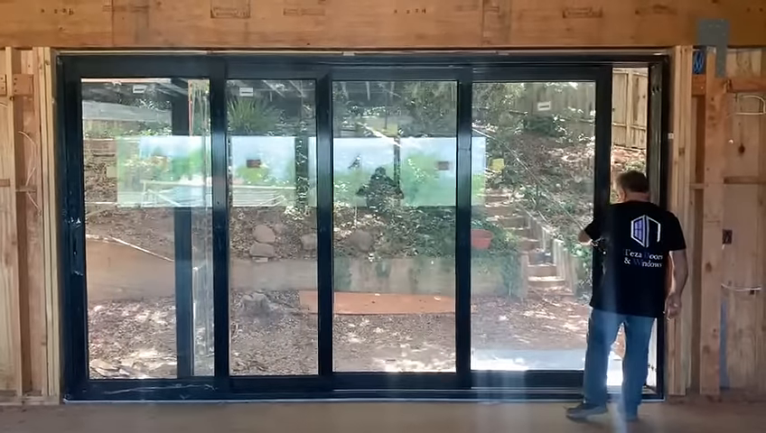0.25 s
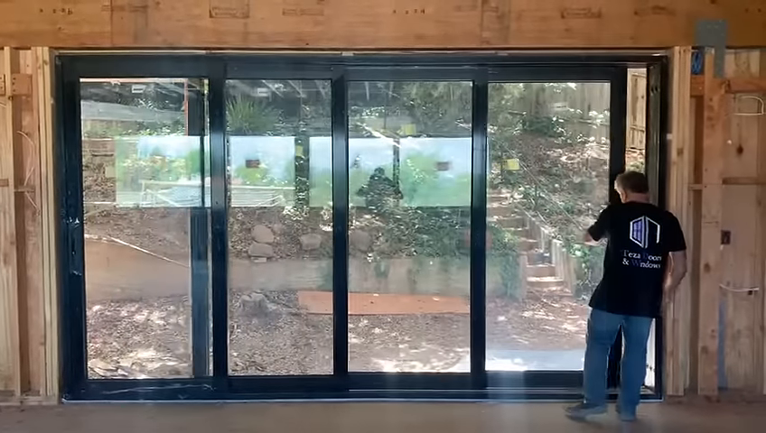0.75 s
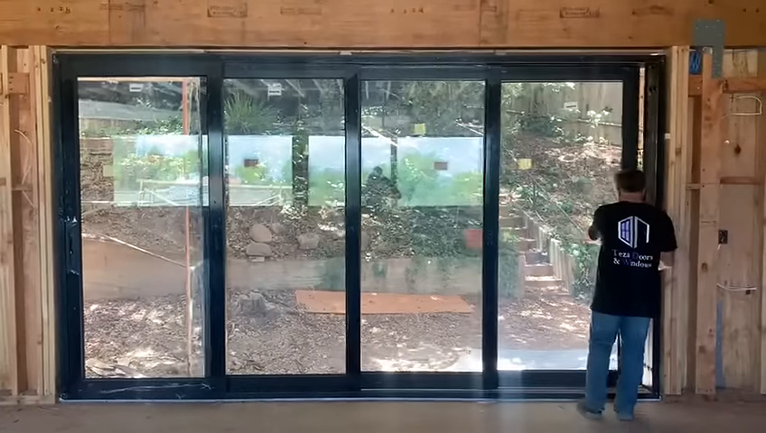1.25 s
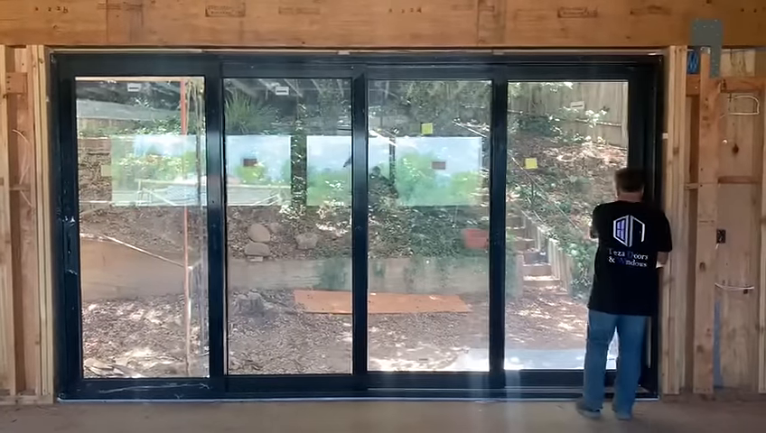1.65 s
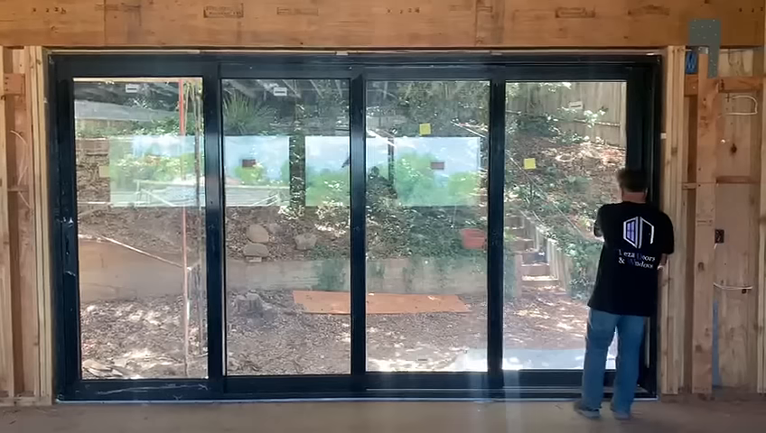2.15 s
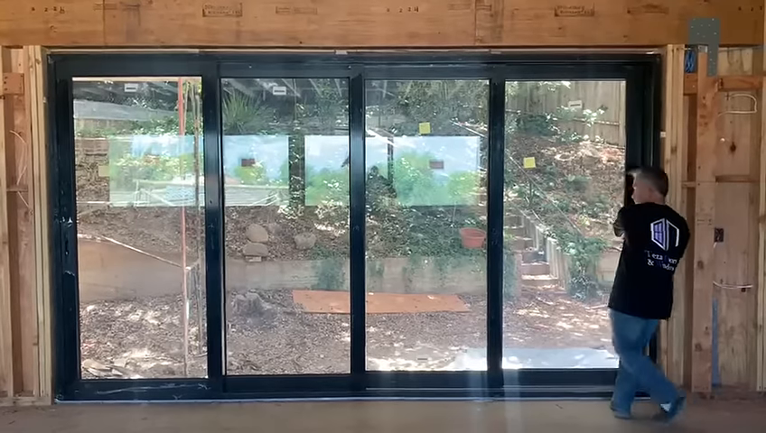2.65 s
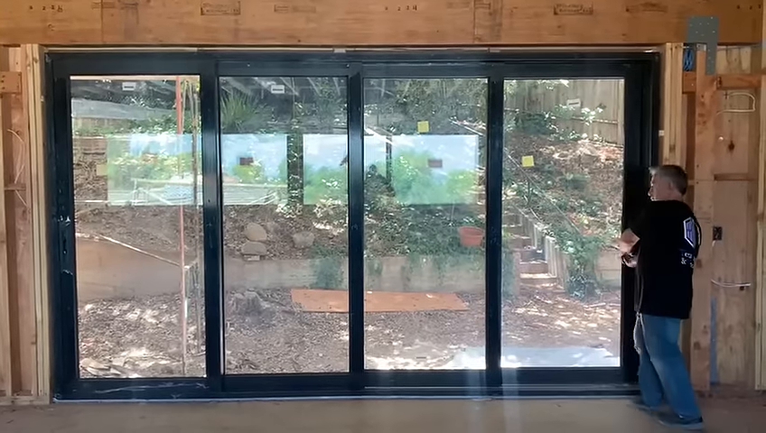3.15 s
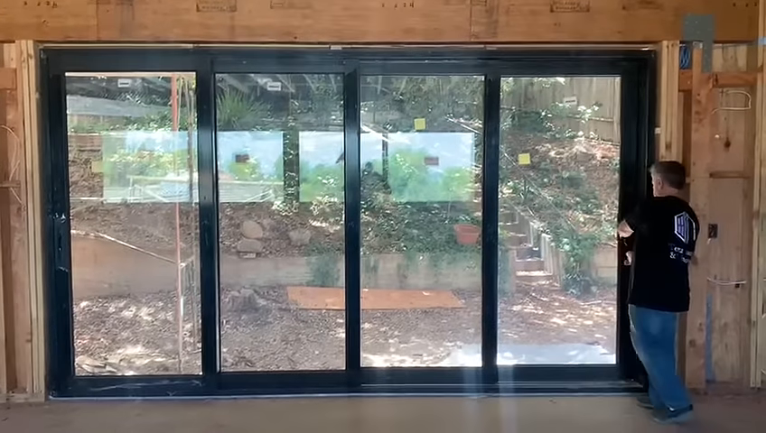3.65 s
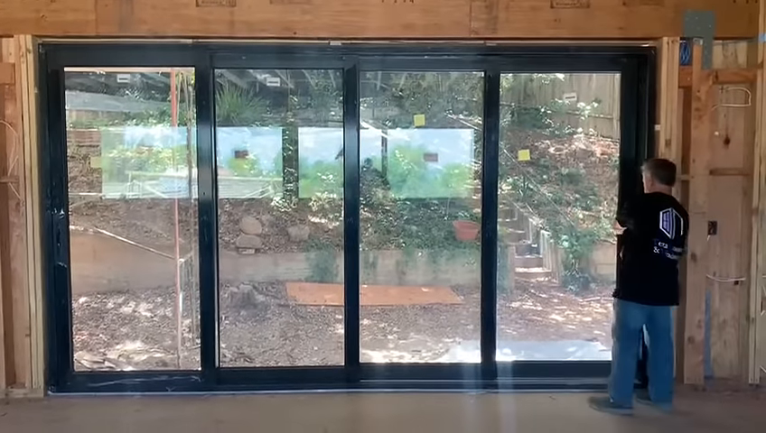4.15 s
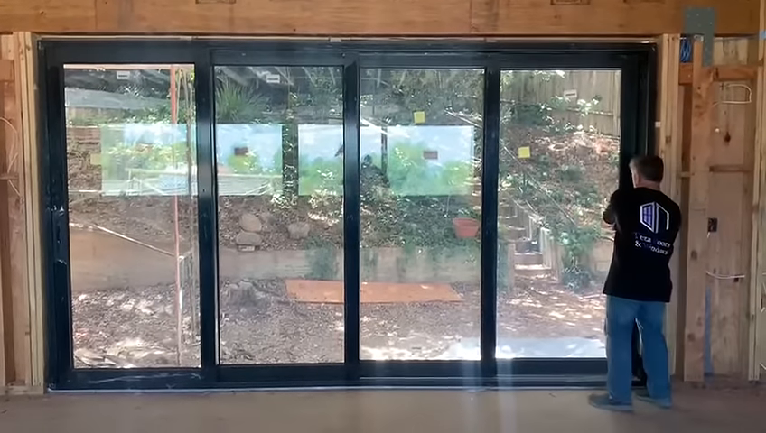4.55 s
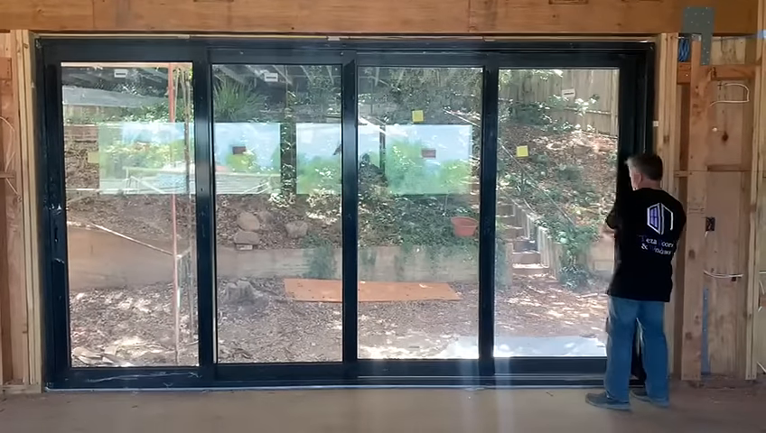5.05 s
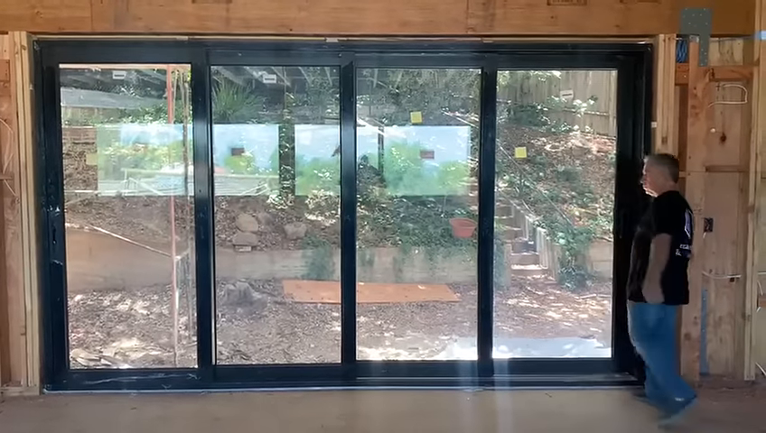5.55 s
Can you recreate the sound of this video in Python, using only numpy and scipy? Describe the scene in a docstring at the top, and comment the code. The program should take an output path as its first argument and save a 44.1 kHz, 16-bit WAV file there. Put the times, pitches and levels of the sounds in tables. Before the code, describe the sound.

A low rolling rumble ends in a cluster of thuds, followed by small clicks, scuffs and one loud metallic latch slam with roomy reverberation.

```python
"""Heavy glass panels rumble along their track, fade, then swell briefly and bump to a stop in a bare room
of timber and concrete. Shoes scuff the slab, the handle knocks, the lock clicks and the latch slams home.
Rollers are grit thumps and seal hiss; blows and friction are shaped pushes and noise; metal and glass are
decaying sines. All of it stirs a diffuse room, heard some metres away by a close pair of microphone ports."""
import sys
import numpy as np
from scipy import signal
from scipy.fft import rfft, irfft, next_fast_len
from scipy.io import wavfile
from scipy.ndimage import uniform_filter1d

SR = 44100
rng = np.random.default_rng(int(sys.argv[2]) if len(sys.argv) > 2 else 0)


def master_out(mix):
    """Clip the mix to full scale and print it as 16-bit PCM to the path in sys.argv[1]."""
    frames = np.transpose(np.atleast_2d(mix))
    ceiling = np.clip(frames, -1, 1)
    pcm = np.round(ceiling * 32767).astype(np.int16)
    wavfile.write(sys.argv[1], SR, pcm)


N = 256216

# Source levels in the tables stand ahead of the mixing gains in scene().
# edges of the bands that carry blows and friction: edge_hz
BAND_EDGES_HZ = [30, 100, 200, 400, 1000, 2500, 5000, 8500, 12500]


def amp(db):
    """Turns decibels into gain."""
    return 10 ** (np.asarray(db) / 20)


def evened(x):
    """Scales to an rms of one."""
    return x / np.sqrt(np.mean(x ** 2) + 1e-20)


def read(points, hz):
    """Reads a table over log frequency."""
    f, value = np.transpose(points)
    return np.interp(np.log(hz + 1), np.log(f + 1), value)


def coloured(x, points):
    """Shapes a signal by a spectrum in dB."""
    size = next_fast_len(N)
    gain = amp(read(points, np.fft.rfftfreq(size, 1 / SR)))
    return irfft(rfft(x, size) * gain, size)[:N]


def band(x, lo, hi):
    """Passes the band between two pitches in Hz."""
    return signal.sosfilt(signal.butter(2, [lo, hi], "bandpass", fs=SR, output="sos"), x)


def centres(count):
    """Gives the middle pitch of the top bands, as a column."""
    edges = np.array(BAND_EDGES_HZ[-count - 1:])
    return np.sqrt(edges[1:] * edges[:-1])[:, None]


def add(mix, s, sound):
    """Mixes one sound into every row from s seconds on."""
    part = mix[:, round(s * SR):][:, :sound.shape[1]]
    part += sound[:, :part.shape[1]]


def through_bands(envelopes, push_hz=400):
    """Each envelope drives its band's filter: as one push in the bass, as noise above."""
    edges = BAND_EDGES_HZ[-len(envelopes) - 1:]
    out = np.zeros(N)
    for envelope, lo, hi in zip(envelopes, edges, edges[1:]):
        noise = rng.standard_normal(N) * np.sqrt(SR / 2 / (hi - lo))  # even power for any bandwidth
        drive = 3 if hi < 1.1 * push_hz else noise
        out += band(envelope * drive, lo, hi)
    return out


def struck(hits, modes, rise_s, detune=0.0065):
    """Each hit rings the object's modes as decaying sines, with its own tilt and small random changes."""
    out, t = np.zeros((1, N)), np.arange(SR // 5) / SR
    chance = rng.standard_normal((len(hits), len(modes), 2))
    for (s, level_db, tilt_db), spread in zip(hits, chance):
        ring = np.zeros(len(t))
        for (hz, db, t60), (level_chance, pitch_chance) in zip(modes, spread):
            mode_db = db + tilt_db * np.log2(hz / 1000) + 1.5 * level_chance
            pitch = hz * (1 + detune * pitch_chance)
            ring += amp(mode_db - 60 * t / t60) * np.sin(2 * np.pi * pitch * t)
        onset = np.minimum(t / max(rise_s, 1 / SR), 1)
        add(out, s, amp(level_db) * onset * ring[None])
    return out[0]


def still_air():
    """The idle room is two unrelated beds of coloured noise that rise, then fall away."""
    # colour of the still room: pitch_hz, relative level_db
    colour = [(15, -57.5), (25, -36.5), (60, 1.5), (183, -7.5), (367, -14), (500, -26), (1500, -32.5),
              (4730, -26.5), (5120, -32.5), (7350, -32), (8360, -34.5), (12000, -27), (15600, -65.5),
              (22000, -120)]
    # its loudness: time_s, level_db
    loudness = [(0, -77), (3.5, -68), (5, -70.5), (5.249, -74), (5.81, -77)]
    air = np.array([evened(coloured(rng.standard_normal(N), colour)) for _ in range(2)])
    return amp(np.interp(np.arange(N) / SR, *np.transpose(loudness))) * air


def diffuse(x, size, weight, patchy_db, blur=0):
    """Every pitch stores energy that dies at its own speed and returns as two unrelated, patchy fields."""
    # how long the room holds each pitch: pitch_hz, t60_s
    decay = [(40, 1), (150, 0.8), (500, 1), (1400, 0.74), (3100, 0.67), (6500, 0.42), (11500, 0.17)]
    hz, t, z = signal.stft(x, SR, nperseg=size, noverlap=size * 3 // 4)
    keep = amp(-2 * 60 * t[1] / read(decay, hz))  # doubled, as this is energy
    stored = uniform_filter1d(abs(z) ** 2, size=2, axis=0) * weight(hz)[:, None]
    for k in range(1, len(t)):
        older = stored[:, k - 1]
        # this share of the energy passes to each neighbouring pitch per frame
        older = older + blur * (np.roll(older, 1) + np.roll(older, -1) - 2 * older)
        stored[:, k] = keep * older + (1 - keep) * stored[:, k]
    re, im, patches = rng.standard_normal((3, 2, *z.shape))
    patches = evened(uniform_filter1d(patches, size=6000 // size, axis=2))  # standing waves linger
    field = np.sqrt(abs(stored)) * (re + 1j * im) * amp(patchy_db * patches)
    tail = signal.istft(field, SR, nperseg=size, noverlap=size * 3 // 4)[1]
    return np.pad(tail, [(0, 0), (size // 2, 0)])[:, :N]  # reflections come after the direct sound


def room(x, split_hz=250):
    """The treble fills the room quickly, the bass slowly, through short and long frames."""
    def above(hz):
        return 1 / (1 + (split_hz / (hz + 1)) ** 6)

    def below(hz):
        return 1 / (1 + (hz / split_hz) ** 6)

    treble = diffuse(x, size=512, weight=above, patchy_db=3.0, blur=0.04)
    bass = diffuse(x, size=2048, weight=below, patchy_db=3.0)
    return treble + amp(0.5) * bass


def scuffs(grain_db=1.5, catch_db=4.5):
    """Soles and hands drag as gritty noise that swells and lets go; catching grit rings the rubbed part."""
    # drags: start_s, strength_db, tilt_db_per_octave, swell_s, length_s, rubbed_part_hz, rubbed_part_db
    drags = [(1.1, -42, 3, 0.0034, 0.068, 2850, -49.5), (1.167, -57.5, 0.3, 0.019, 0.21, 2800, -70),
             (2.261, -45, 0, 0.031, 0.079, 4200, -52), (2.721, -59, 1.8, 0.018, 0.15, 1720, -61),
             (2.821, -48.5, -0.5, 0.02, 0.14, 1390, -52), (2.901, -51.5, 0.5, 0.04, 0.14, 1600, -67),
             (2.953, -47.5, -4.5, 0.052, .13, 2230, -48), (3.284, -56, 0, 0.017, 0.12, 2500, -83),
             (3.761, -44, -2.5, 0.01, 0.07, 4000, -51), (3.9, -40, -3, 0.054, 0.11, 1120, -48.5),
             (4.495, -52.5, -7, 0.034, 0.09, 1830, -47.5), (4.624, -47, -8, 0.029, 0.064, 3800, -69),
             (4.895, -60, -5.5, 0.013, 0.078, 2100, -58), (5.267, -48.5, 1.1, 0.029, 0.068, 2820, -64),
             (5.643, -63, 2.5, 0.033, 0.15, 3510, -71)]
    # colour of the friction: pitch_hz, level_db
    friction = [(280, -25), (630, -8), (1580, -3.5), (3500, 0.5), (6500, -6), (10300, -8)]
    rub_width, catches_per_s = 0.14, 370  # resonance reaches this share to either side of its pitch
    let_go_s = 0.15  # shorter drags never reach full strength
    hz = centres(count=6)
    envelopes, rubbed = np.zeros((len(hz), N)), np.zeros((1, N))
    catches = amp(catch_db * np.minimum(rng.exponential(1, N), 4))
    catches *= (rng.random(N) < catches_per_s / SR) * rng.choice([-1., 1.], N)
    for s, db, tilt_db, rise, length, part_hz, part_db in drags:
        t = np.arange(0, max(length, .02), 1 / SR)
        stroke = np.clip(t / max(rise, .002), 0, 1) * np.clip((t[-1] - t) / let_go_s, 0, 1)
        add(envelopes, s, amp(db + read(friction, hz) + tilt_db * np.log2(hz / 2500)) * stroke)
        caught = catches[round(s * SR):][:len(t)]
        ring = band(caught, part_hz / (1 + rub_width), part_hz * (1 + rub_width))
        add(rubbed, s, amp(part_db) * evened(ring)[None] * stroke[:len(ring)])
    grain = evened(uniform_filter1d(rng.standard_normal(envelopes.shape), size=300))
    return through_bands(envelopes * amp(grain_db * grain), push_hz=0) + rubbed[0]


def lock_ticks():
    """Small parts of the lock tick, each a short cluster of decaying sines."""
    # ticks: start_s, level_db, tilt_db_per_octave
    ticks = [(3.522, -46, -5), (3.534, -51.5, -3), (3.6415, -48, -3.5), (3.655, -52, -6), (3.673, -55.5, 5),
             (3.69, -58, -0.5), (3.715, -55.5, 1.5), (3.916, -46, -2)]
    # rings of the small parts: pitch_hz, level_db, t60_s
    pins = [(1055, -0.5, 0.036), (1315, -3, 0.043), (1810, -4.5, 0.071), (4000, -11.5, 0.04),
            (4350, -7.5, 0.1), (6570, -11, .025)]
    return struck(ticks, pins, rise_s=0.00068, detune=.02)


def handle_knocks():
    """The handle knocks in its seat, with a softer onset and low, brief rings."""
    # knocks: start_s, level_db, tilt_db_per_octave
    knocks = [(3.199, -53, -1), (3.209, -45, 0.7), (3.219, -41, 1), (3.232, -49.5, -4.5), (4.629, -46, 5),
              (4.647, -43, 3), (4.661, -48, -4.5), (4.683, -59, 7), (4.908, -48.5, -0.5), (4.94, -52.5, -4),
              (5.012, -66, -5)]
    # rings of the handle: pitch_hz, level_db, t60_s
    handle = [(309, -2, 0.058), (506, -1.5, 0.052), (643, 0.5, 0.069), (895, -7, 0.074), (1330, -7, 0.023),
              (1930, -2, 0.021)]
    return struck(knocks, handle, rise_s=0.0035, detune=0.02)


def lock_snaps():
    """The metal of the lock clicks and rings on its own pitches."""
    # clicks: start_s, level_db, tilt_db_per_octave
    snaps = [(2.483, -40, 0.5), (2.4914, -40, -1.5), (2.4964, -43, -9), (2.514, -49, 2.5), (2.528, -45, -3),
             (2.545, -49, -1), (2.565, -59, -5), (2.591, -54, 3), (2.596, -55, 0), (2.61, -59, -2),
             (2.626, -52, -2)]
    # rings of the lock: pitch_hz, level_db, t60_s
    lock = [(885, -11.5, .06), (1203, -4.5, 0.061), (1823, -13, 0.14), (2283, -5.5, 0.12),
            (2650, -7.5, 0.096), (3835, -1.5, 0.06), (4420, -8, 0.064), (5000, -21, .1), (6930, -25, 0.042)]
    return struck(snaps, lock, rise_s=0.00068)


def latch_slams():
    """The latch slams home and chatters, ringing latch and jamb."""
    # slams: start_s, level_db, tilt_db_per_octave
    slams = [(4.0105, -19.5, 5.5), (4.017, -23.5, 3.5), (4.021, -24.5, 0), (4.031, -34, -5),
             (4.045, -36, -1.5), (4.054, -39, -1), (4.074, -34.5, 4), (4.088, -40.5, 1.5),
             (4.123, -34.5, 4), (4.163, -36.5, -1)]
    # rings of latch and jamb: pitch_hz, level_db, t60_s
    jamb = [(315, -12, 0.036), (481, -17, 0.05), (945, -11.5, 0.084), (1107, -4.5, 0.035),
            (1410, -6, 0.047), (1810, -4, 0.028), (1950, -8, 0.019), (2580, -6, 0.014),
            (3326, -11.5, 0.014), (3940, -10.5, 0.021), (6450, -16, 0.017)]
    return struck(slams, jamb, rise_s=0.00096, detune=0.017)


def booms():
    """After a jolt the glass panels swell over a cycle or so and die on one pitch."""
    # jolts: start_s, level_db, pitch_hz, t60_s
    jolts = [(1.655, -37.5, 270, .1), (1.686, -29, 249, .1), (1.7205, -21.5, 166, 0.059),
             (1.7226, -26, 269, 0.039), (1.802, -29.5, 110, 0.062), (2.294, -40.5, 283.5, .14),
             (2.301, -47, 152, .15), (2.338, -46, 289, .12), (2.663, -33.5, 148, 0.094),
             (2.797, -45, 140, .1), (4.012, -25.5, 317, .13), (4.039, -28.5, 491, .13),
             (4.094, -24.5, 172.5, 0.076), (4.118, -30.5, 1405, .06), (4.714, -44, 113, .1),
             (5.313, -59, 128, .12), (5.684, -53, 143, .15), (5.72, -59.5, 131, .15),
             (5.784, -52, 110, .12)]
    rise_cycles = 1.5
    out, t = np.zeros((1, N)), np.arange(SR // 4) / SR
    for s, db, hz, t60 in jolts:
        swell = np.minimum(t * hz / rise_cycles, 1)
        boom = swell * amp(db - 60 * t / t60) * np.sin(2 * np.pi * hz * t)
        add(out, s, boom[None])
    return out[0]


def blows(crack=0.13):
    """Each blow is a thud and a crack, shorter in the treble, that set the door ringing."""
    # blows on door, handle and floor: start_s, thud_db, thud_hz, crack_db, treble_tilt_db_per_octave
    impacts = [(0.669, -39.5, 142, -49, -6.5), (1.047, -36, 180, -76, 2.5),
               (1.656, -43.5, 266, -35.5, -7.5), (1.674, -32, 242, -30, -0.5), (1.685, -31, 236, -37, -10),
               (1.693, -39, 273, -42, -16), (1.7, -24, 163.5, -32, -50), (1.726, -34.5, 201.5, -40, -8),
               (1.736, -45, 70, -50, -2), (1.762, -31.5, 70.4, -38.5, -5), (1.776, -36, 200, -41, -6.5),
               (1.79, -41.5, 200.6, -43.5, -10), (1.81, -40, 109, -43, -15), (1.837, -41, 150, -46, -8),
               (1.869, -36.5, 111, -54.5, -4), (1.915, -36, 70, -69, -5), (2.155, -47, 198, -43.5, -32),
               (2.293, -52, 310, -49.5, -1), (2.48, -53, 900, -47, 5), (2.588, -44.5, 905, -44, 0.5),
               (2.66, -39.5, 300, -56, -15), (2.715, -42.5, 160, -58, -7), (2.761, -40, 166, -62, -7),
               (2.795, -46, 141.7, -51, -1), (3.195, -48.5, 437, -42, -11.5),
               (3.519, -57, 1200, -48.5, -20.5), (3.638, -49, 1220, -42.5, -9.5),
               (4.008, -45, 250, -22.5, -1), (4.013, -34.5, 222, -39, -2), (4.032, -33, 250, -44, -4.5),
               (4.096, -35.5, 133.7, -33, -0.5), (4.085, -46.5, 199.3, -34.5, 0.5),
               (4.575, -54, 278, -66, -13), (4.627, -54, 590, -48, 0), (4.768, -41, 118.7, -42, -38),
               (4.905, -49, 330, -51, -14), (5.657, -44.5, 202, -64.5, 4.5), (5.753, -49, 101, -65.5, 0)]
    # rings of frame and glass: pitch_hz, level_db, t60_s
    door = [(150, -1, 0.052), (196, 1, 0.055), (269, 7.5, 0.056), (400, -3, 0.08), (690, -4, 0.065),
            (1194, 3, 0.055), (1300, -3.5, 0.062), (1740, -8, 0.057), (1940, -6.5, 0.041),
            (2620, -4.5, 0.09)]
    thud_below_db, thud_above_db = 13, 19.5  # fall per octave on either side of the thud's pitch
    thud_lag_s = 0.0029  # the mass arrives just after the crack
    thud_rise, thud_contact = 0.54, 2  # time constants in cycles of the thud's pitch
    knee_hz, crack_below_db = 1210, 6  # knee of the crack; fall per octave under it
    rise_s, contact_s = 0.0039, 0.0087  # time constants of a hard crack in a band that ends at 1 kHz
    hard_db, softer_per_db = -20, 0.0032  # each dB under hard spreads the crack by this share
    ring_db = 5
    envelopes = np.zeros((len(BAND_EDGES_HZ) - 1, N))
    t, hz = np.arange(SR // 4) / SR, centres(count=8)
    quicker = (np.array(BAND_EDGES_HZ[1:])[:, None] / 1000) ** crack
    over_knee = np.log2(hz / knee_hz)
    for s, thud_db, thud_hz, crack_db, tilt_db in impacts:
        over_thud = np.log2(hz / thud_hz)
        thud = amp(thud_db + np.minimum(thud_below_db * over_thud, -thud_above_db * over_thud))
        slope_db = np.where(over_knee > 0, tilt_db, crack_below_db)
        snap = (hz > 400) * amp(crack_db + slope_db * over_knee)
        u = t * quicker / (1 + softer_per_db * max(hard_db - crack_db, 0))
        add(envelopes, s, snap * (1 - np.exp(-u / rise_s)) * np.exp(-u / contact_s))
        cycles = t * thud_hz
        push = (1 - np.exp(-cycles / thud_rise)) * np.exp(-cycles / thud_contact)
        add(envelopes, s + thud_lag_s, thud * push)
    burst = through_bands(envelopes)
    rings = np.zeros(len(t))
    for pitch, db, t60 in door:
        at_resonance = 2 * np.log(1000) / t60 / SR  # makes the mode's level its gain at resonance
        rings += amp(db - 60 * t / t60) * np.cos(2 * np.pi * pitch * t) * at_resonance
    return burst + amp(ring_db) * signal.oaconvolve(burst, rings)[:N]


def rolling():
    """Grit under the rollers thumps the panel body; the brush seals hiss along the frame."""
    # rumble of the rollers up to the stop: time_s, level_db
    roll = [(0, -49.5), (.5, -51), (1, -51), (1.2, -51.5), (1.35, -54), (1.5, -58), (1.619, -62),
            (1.68, -37.5)]
    # colour of the panel body under the rollers: pitch_hz, relative level_db
    body = [(15, -45.5), (25, -35), (38, -14.5), (91, 2), (155, -1), (193, 3.5), (231, 3.5), (371, -20),
            (450, -86), (580, -46), (990, -120)]
    # colour of the brush seals: pitch_hz, relative level_db
    seals = [(240, -27), (400, -8.5), (953, -1), (2270, -9), (3060, -3.5), (5490, -12), (7290, -20.5),
             (9160, -35), (10700, -18.5), (12000, -26.5), (15600, -82.5), (22000, -120)]
    bumps_per_s = 170
    seals_db, seals_follow = -53, 0.38  # hiss at the start; share of the rumble's change it follows
    s, db = np.transpose(roll)
    t = np.arange(N) / SR
    rumble_db = np.interp(t, s, db)
    moving = np.clip((s[-1] - t) / 0.013, 0, 1)  # comes to rest over the last 13 ms
    grit = amp(1.8 * np.minimum(rng.exponential(1, N), 5)) * (rng.random(N) < bumps_per_s / SR)
    rumble = evened(coloured(grit * rng.choice([-1., 1.], N), body))
    hiss = evened(coloured(rng.standard_normal(N), seals))
    hiss_db = seals_db + seals_follow * (rumble_db - db[0])
    return moving * (amp(rumble_db) * rumble + amp(hiss_db) * hiss)


def scene():
    """Mixes two rows: the centre sound and the side sound, which is opposed in left and right."""
    roll, near = rolling(), blows() + scuffs()
    brief = booms() + lock_ticks()  # these stir the room less
    latch = lock_snaps() + latch_slams() + handle_knocks()
    direct = amp(-4.5) * roll + amp(-3.0) * near + latch + amp(-1.5) * brief
    # a small difference in arrival time puts the side part a quarter turn behind
    sideways = amp(-2.5) * signal.hilbert(direct, next_fast_len(N)).imag[:N]
    into_room = amp(-7.5) * roll + amp(2.5) * near + amp(2.0) * latch + amp(-2.0) * brief
    return np.array([direct, sideways]) + room(into_room) + still_air()


def record(dry):
    """Sets the final tone of the centre and side sound, then limits the band."""
    # tone of the centre sound, thin around 8 to 9 kHz: pitch_hz, gain_db
    centre_tone = [(20, -22), (40, 12.5), (6000, -6), (7400, -1.5), (8100, -28), (9200, -22.5),
                   (9800, -1.5), (12000, -10)]
    # tone of the side sound: pitch_hz, gain_db
    side_tone = [(40, -6), (150, -8.5), (300, -7.5), (600, -1.5), (1100, -1), (5500, -5), (6900, -10.5),
                 (8000, 2.5), (9800, -2), (11000, -44)]
    left_db, edge_hz = .35, 12050  # left is raised and right lowered by left_db
    centre, side = coloured(dry[0], centre_tone), coloured(dry[1], side_tone)
    pair = np.array([centre + side, centre - side]) * amp([[left_db], [-left_db]])
    low_pass = signal.firwin(511, edge_hz, window=("kaiser", 9), fs=SR)
    return signal.oaconvolve(pair, low_pass[None], "same")


dry = scene()
out = record(dry)
master_out(out)
```